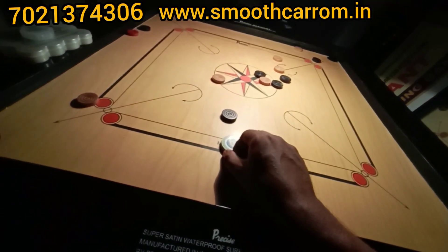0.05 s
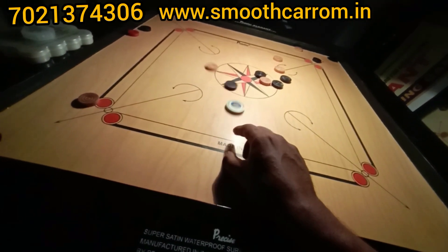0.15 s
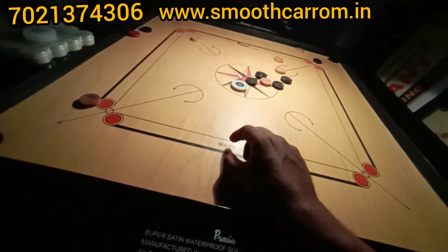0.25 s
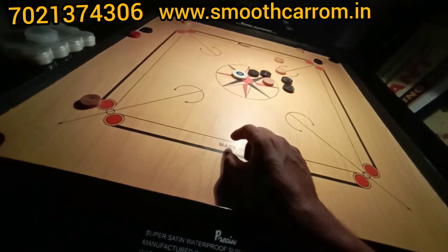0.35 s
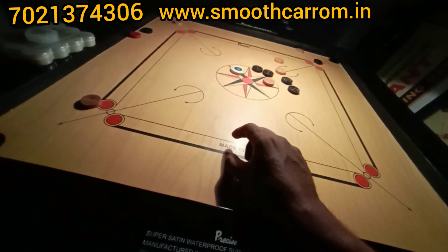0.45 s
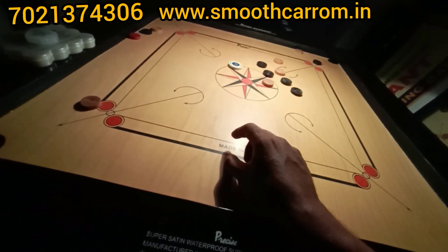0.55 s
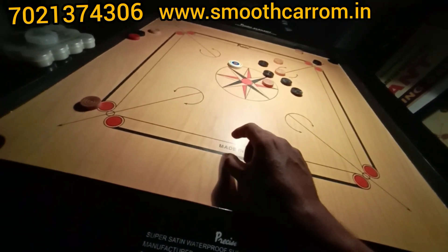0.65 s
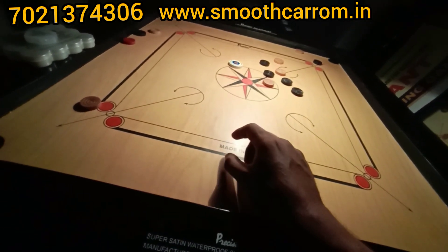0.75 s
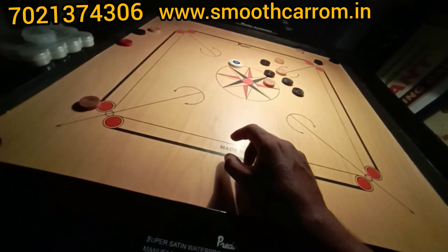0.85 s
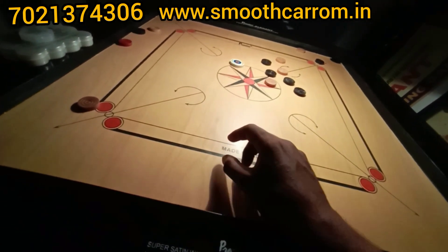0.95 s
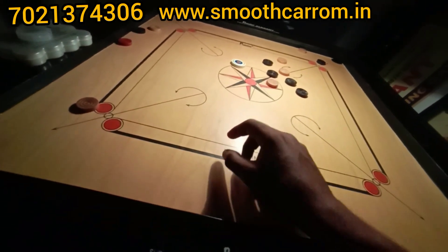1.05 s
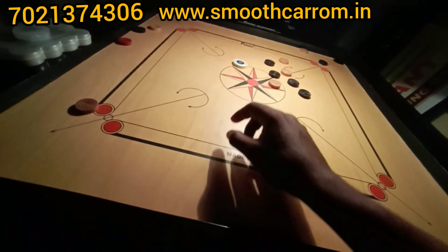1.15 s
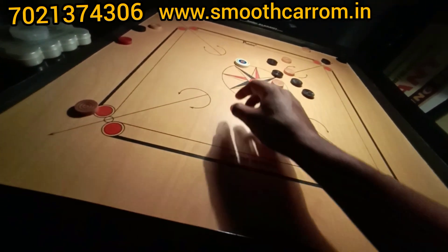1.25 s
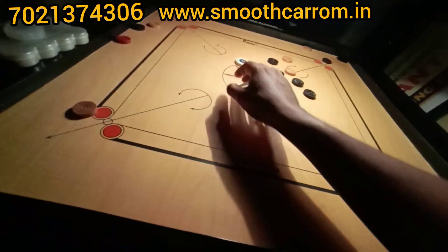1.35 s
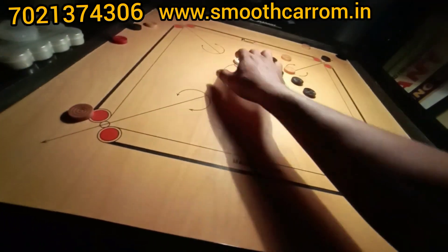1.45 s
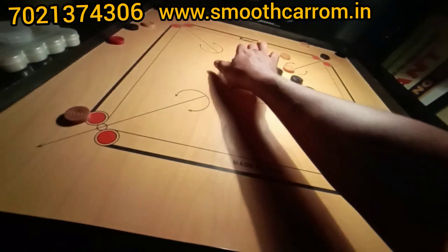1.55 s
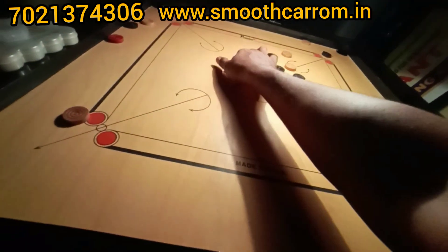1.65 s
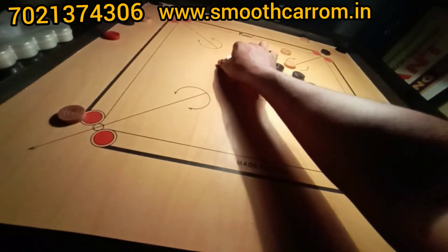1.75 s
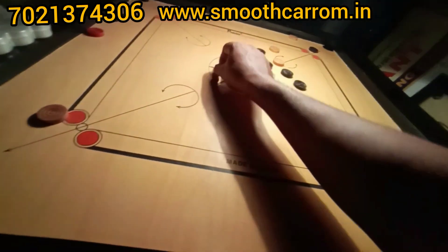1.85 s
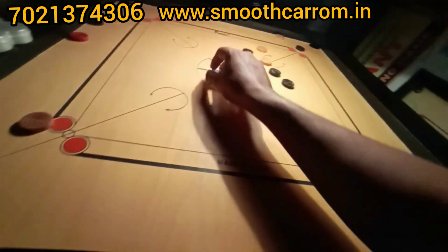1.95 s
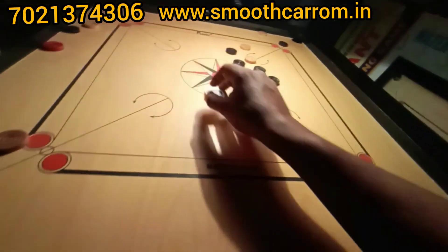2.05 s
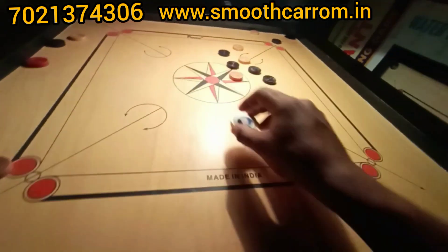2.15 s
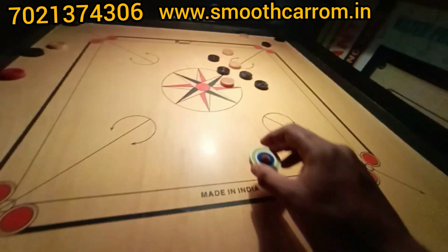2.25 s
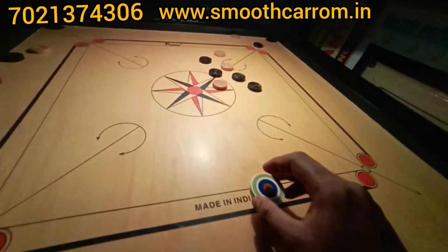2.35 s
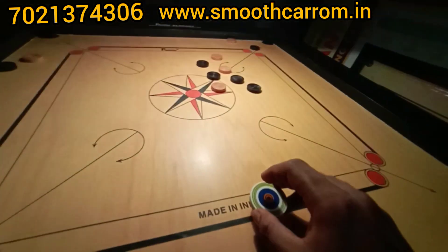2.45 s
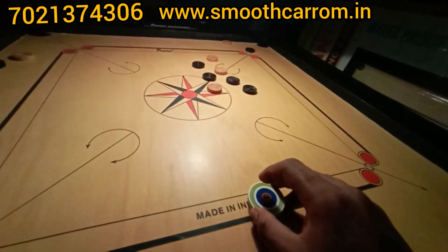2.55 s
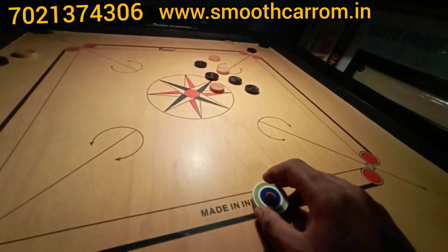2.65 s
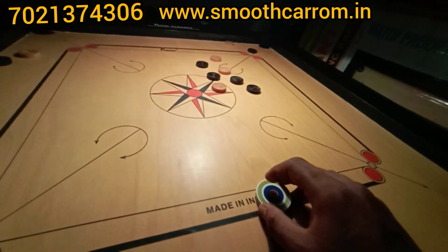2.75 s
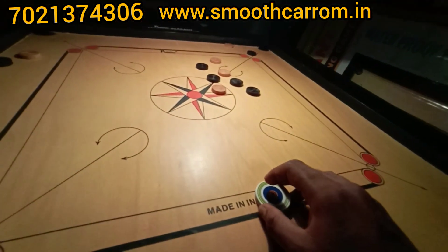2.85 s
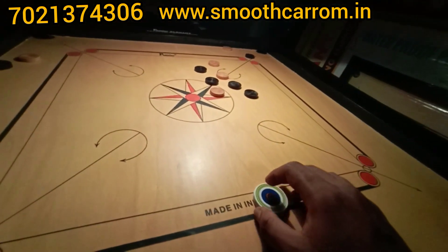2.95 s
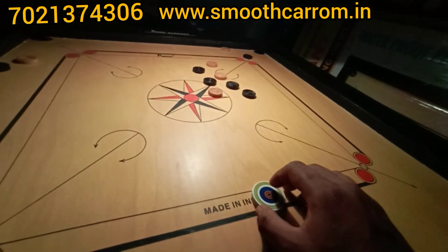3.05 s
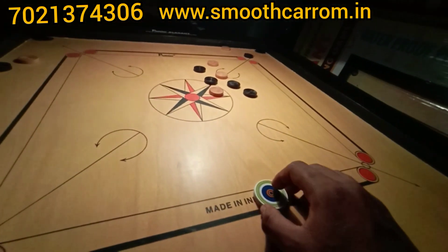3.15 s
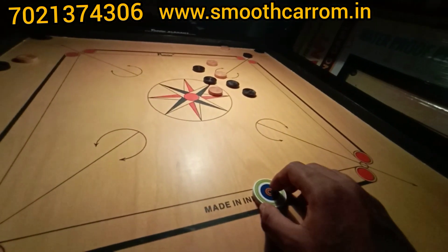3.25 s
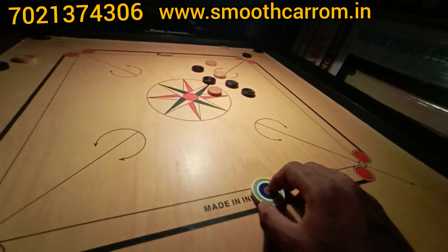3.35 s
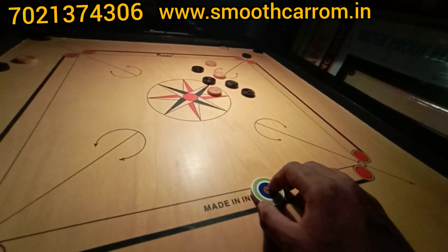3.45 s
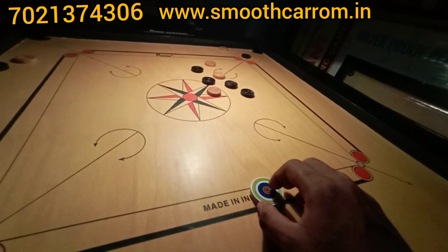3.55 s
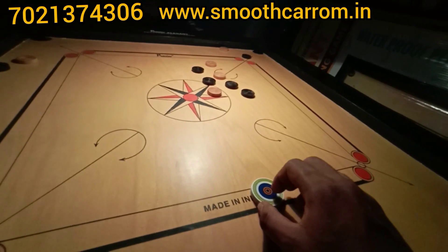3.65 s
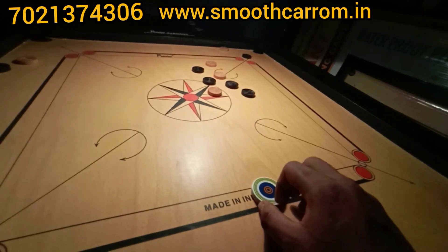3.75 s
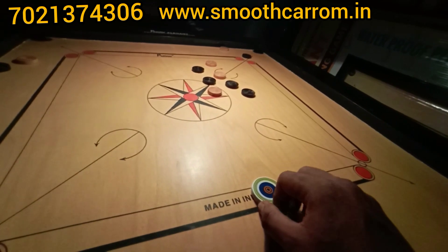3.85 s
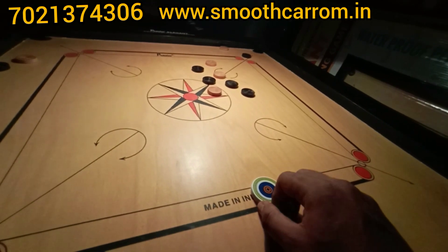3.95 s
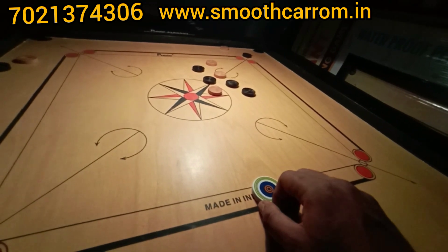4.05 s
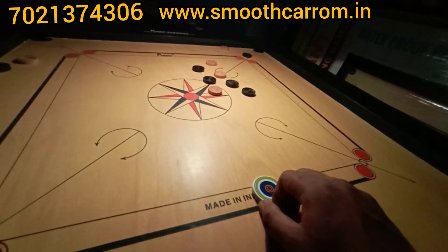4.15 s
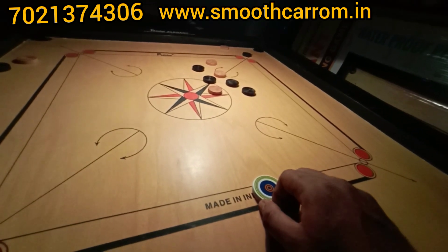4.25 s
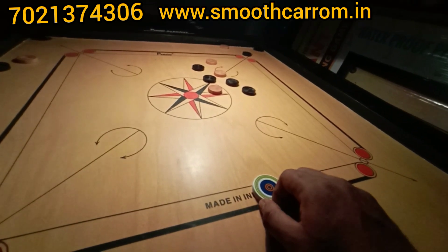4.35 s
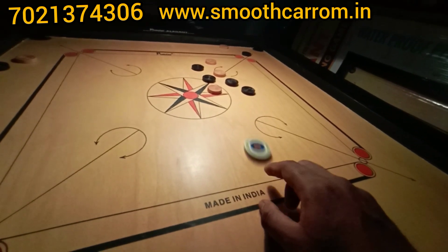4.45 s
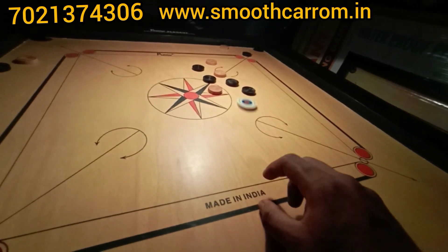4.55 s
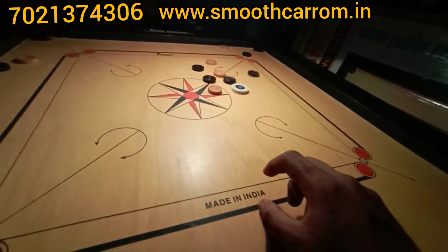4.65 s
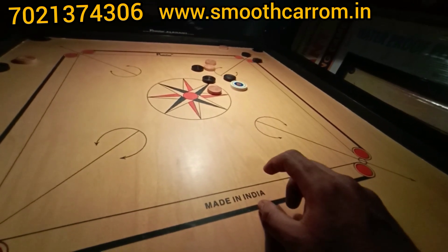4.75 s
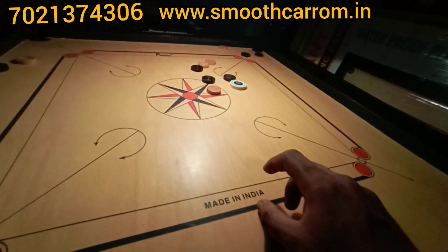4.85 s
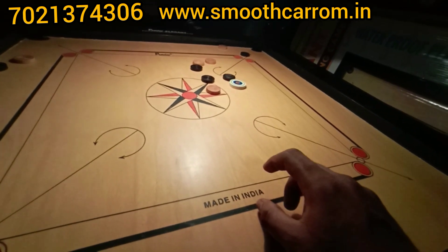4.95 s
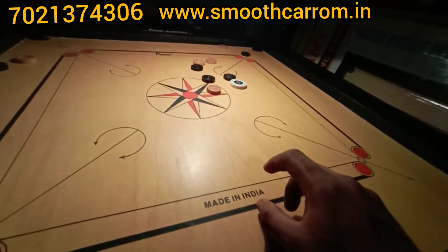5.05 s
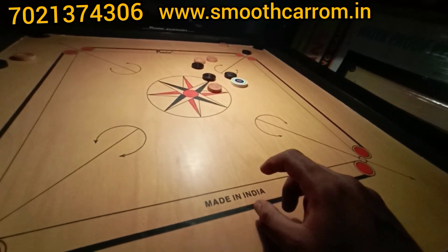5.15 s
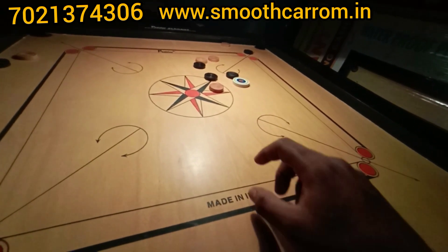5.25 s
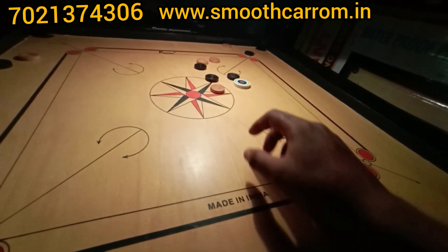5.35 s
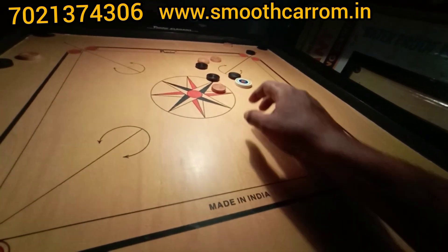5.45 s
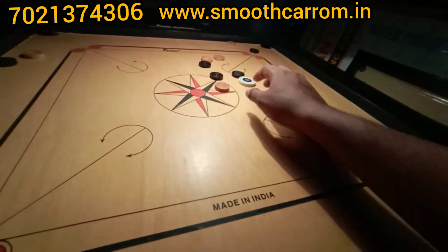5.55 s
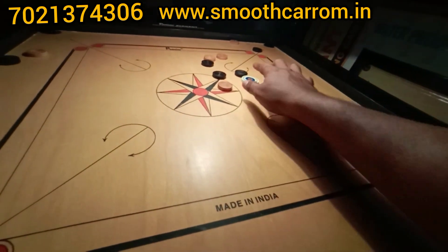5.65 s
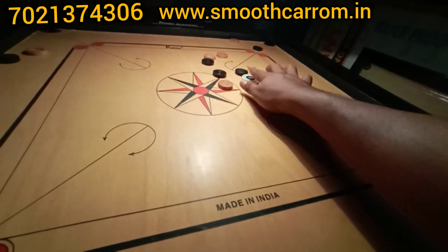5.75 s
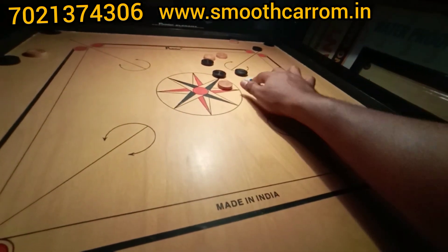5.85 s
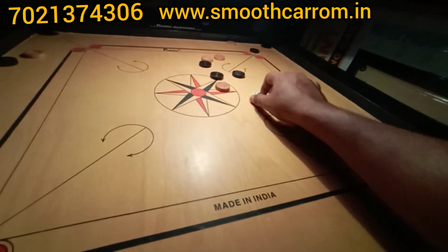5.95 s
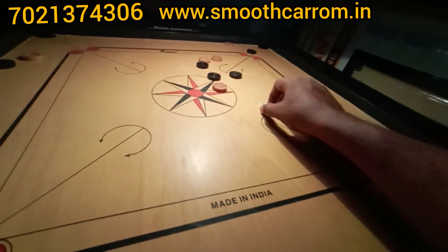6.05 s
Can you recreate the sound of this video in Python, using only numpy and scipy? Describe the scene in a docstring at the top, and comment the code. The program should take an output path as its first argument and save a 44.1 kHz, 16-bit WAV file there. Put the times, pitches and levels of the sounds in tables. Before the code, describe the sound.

Close to a wooden carrom board in a small room, a flicked striker cracks into a disc, rattles through others and knocks the frame. A hand drags it back with a soft hiss while a heavy vehicle drones outside. After a quiet pause and a faint raspy horn, a second shot clicks and clatters, ending with another drag.

```python
"""Carrom discs click against each other and knock on the frame in a small room, over two shots.
Each blow is a sharp pulse with a short ring, board tones, echoes and room sound; some push the board.
Sliding discs hiss as coloured noise, and after each shot a hand drags the striker back.
Traffic rumbles outside in shaped noise, a heavy vehicle drones past, and faint tones glide far off.
A distant horn, made of overtones and raspy noise, sounds once."""
import sys
import numpy as np
from scipy import signal
from scipy.fft import rfft, irfft
from scipy.io import wavfile
from scipy.ndimage import uniform_filter1d, minimum_filter1d

SR = 44100
rng = np.random.default_rng(int(sys.argv[2]) if len(sys.argv) > 2 else 0)


def persist_wave(psi):
    """Save psi, clipped to +-1, as 16-bit WAV."""
    counts = np.round(np.clip(psi, -1, 1) * 32767).astype(np.int16)
    wavfile.write(sys.argv[1], SR, np.atleast_2d(counts).T)


N = 269086  # length in samples

# room tone and traffic through the walls; colours are relative: hz, level_db (per Hz)
RUMBLE_COLOUR = [(12, -57), (20, -16), (27, -30.5), (41, -20.5), (51, -13.5), (72, -4.5), (93, 5.5),
                 (145, -5), (188, -15), (209, -17.5), (238, -28), (280, -22.5), (330, -41), (430, -57),
                 (730, -120)]
AIR_COLOUR = [(150, -13), (280, 3.5), (450, -2), (620, -3), (900, -1), (1500, -1.5), (2200, -7), (3800, -6),
              (4600, -15), (7400, -16), (10000, -22.5), (16000, -19.5)]
# slow swell of the traffic, and of the air: time_s, level_db
RUMBLE_LEVEL = [(0, -59), (.75, -51), (1.35, -54.5), (1.85, -48.5), (3.0, -54), (3.65, -52), (4.25, -60),
                (4.9, -49.5), (5.3, -55), (6.1, -53.5)]
AIR_LEVEL = [(0, -60.5), (1.0, -58.5), (2.2, -58.5), (3.1, -57), (3.7, -58), (4.2, -60.5), (5.4, -58.5),
             (6.1, -58.5)]
# hollow resonances of the room's air: centre_hz, width_hz, rise_db
AIR_RESONANCES = [(401, 49, 10.66), (880, 93, 6), (1259, 59, 7.7), (1701, 39, 11)]
# quick random heaving of the rumble
LUMP_DB, LUMPS_PER_S = 3.5, 8.7

# colour of the heavy vehicle's drone, relative: hz, level_db (per Hz)
VEHICLE_COLOUR = [(12, -51), (24, -22), (45, -16.5), (56, -3.5), (66, -0.5), (82, -4), (110, -16),
                  (250, -49.5)]
# nearest moment, time to travel as far as it is away then, and level there
PASS_S, PASS_SPAN_S, PASS_DB = 1.98, 0.47, -52.5

# faint far tones, levels before a shared trim: start_s, length_s, first_hz, last_hz, level_db
FAR_TONES = [(0, 0.1, 1290, 1253, -59), (.48, 0.077, 370, 363, -52.5), (0.571, 0.17, 359, 387, -57),
             (0.842, 0.094, 1230, 1282, -60), (1.472, 0.078, 1350, 1375, -54),
             (1.612, 0.048, 1340, 1387, -46.5), (1.68, 0.119, 1442, 1644, -53.5),
             (1.807, 0.12, 1640, 1360, -52.5), (1.92, 0.084, 4610, 4610, -61),
             (5.96, 0.12, 404, 378.6, -49.5)]

# a struck disc glides over powder: start_s, length_s, level_db (at the start), bright_share (at the start, 0-1)
FREE_GLIDES = [(0.095, 0.72, -47, 0.86), (0.14, 0.14, -35.5, 0.96), (4.426, 0.84, -48, 0.96),
               (4.837, 0.48, -58, 0.8)]
GLIDE_SAG_DB, GLIDE_DULLING = -3.5, .4  # level change and share of brightness lost as friction brakes the disc
GLIDE_RISE_S, GLIDE_STOP_S = .014, 0.1
# a hand drags the striker back in one swing: start_s, length_s, level_db, bright_share (both at full speed)
HAND_DRAGS = [(1.696, 0.22, -45.5, 0.36), (5.864, 0.24, -42.5, 0.67)]
# skew under 1: the hand is fastest before mid-swing; friction noise grows as speed to this power
DRAG_SKEW, DRAG_POWER = 0.76, 1.1
# relative colour of the dull and of the bright hiss: hz, level_db
DULL_HISS_COLOUR = [(150, -17.5), (450, -13), (750, -6.5), (1300, -9.5), (2000, -2.5), (3000, 4),
                    (4000, 0.5), (5500, 0.5), (7400, -12), (16000, -18.5)]
BRIGHT_HISS_COLOUR = [(150, -36), (1300, -6.5), (3000, -16.5), (5000, -3), (7000, 8.5), (9000, 3.5),
                      (12000, 5), (16000, 6)]
# the board under a pressed disc: centre_hz, width_hz, rise_db
PRESSED_BOARD_PEAKS = [(3090, 120, 1), (3700, 210, 4.5)]
SLIDE_ROOM_DB = -6  # level of the room's answer to the sliding

# disc meets disc, except the second row, a faint bright swell just before the rattle:
# time_s, pulse_peak_db, brightness_db (per octave), top_hz (of the pulse),
# ring_db and room_db (both relative to the pulse)
CLICK_ROWS = [(.1379, 5.5, 5, 13900, -14.5, -14), (.1770, -25, 21, 10940, 3.5, 8),
              (.1792, -6, 4.5, 12000, 4.5, -6.5), (.1820, -10, -0.5, 11000, 0.5, -22),
              (.2812, -7.5, 1, 6456, -3, -11.5), (.3240, -11, 4.5, 9150, 4, -17),
              (.3281, -11.5, -3.5, 8000, -2, -3), (.3387, -6.5, -3.5, 8000, -8, -18),
              (.3745, -11.5, -1, 5960, -3, -22), (.6344, -8, -3, 7480, 4.5, -15.5),
              (.6791, -2, 0, 7500, -11.5, -17), (4.6200, -2.5, 0, 8500, -2, -12.5),
              (4.6826, -14, 3.5, 9000, 3, -24), (4.6842, -9, 1.5, 9100, -2.5, -7),
              (4.6980, -26, 15, 14870, -3, -16), (4.7149, -10.5, -1.5, 8400, 4.5, -7),
              (4.8456, -24, -2.5, 5560, 3.5, -25.5), (5.0423, -4.5, 8.5, 14100, 0.5, -0.5),
              (5.1732, -12.5, 1.5, 16700, -1.5, -5)]
# disc meets frame or board: same columns
FRAME_KNOCKS = [(.1030, -36.5, -13.5, 2500, 2.8, -15), (.4341, 0, 4.5, 11500, 3.7, -6.5),
                (2.9525, -34.5, -3, 3530, 2.2, -1), (4.9298, -1, 6, 8030, 1.1, -10),
                (4.9539, -5.5, 6, 3420, 1.7, -7.5), (4.9777, -7.5, 7, 3670, 2.1, -8),
                (5.0107, -15.5, 3.5, 3220, 5, -7.5)]
# relative colour of the two kinds of blow: hz, level_db
CLICK_COLOUR = [(100, -16), (500, -21), (1000, -15.5), (2000, -7.5), (3000, 4), (4200, 9), (5500, 7),
                (7400, 5), (10000, -5.5), (16000, -8.5)]
KNOCK_COLOUR = [(100, -39), (450, -14), (750, -8), (1000, -3.5), (1280, 3.5), (2000, 0.5), (3100, 3.5),
                (4300, -3), (7000, -7), (10000, -14), (16000, -25)]
# tones of the plywood board and frame, levels before each kind of blow's trim: hz, level_db, t60_s
BOARD_TONES = [(400, -52, .15), (965, -45, 0.067), (1264, -24, 0.095), (1842, -33.5, 0.12),
               (2250, -35, 0.077), (2620, -42.5, .07), (3160, -50, 0.035), (3500, -53.5, .07),
               (3590, -34, 0.045), (5390, -34.5, 0.053), (6550, -31.5, 0.083), (9670, -20, 0.02)]
# reflections from ceiling and walls: delay_s, level_db
ECHOES = [(0.0145, -25.5), (0.0169, -23), (.0203, -19)]
# time for the room to fade by 60 dB, before stretch and unevenness: hz, t60_s
ROOM_FADE = [(200, 0.19), (1200, 0.26), (3500, 0.18), (7000, 0.2), (15000, 0.13)]

# hard blows also push the whole plywood sheet: time_s, peak_db
BOARD_THUMPS = [(0.137, -20), (0.1794, -25), (0.4325, -28), (.6344, -38), (.6791, -34), (2.9525, -35.5)]
# relative colour of that push: hz, level_db
THUMP_COLOUR = [(60, -28), (150, 0), (300, 0), (700, 1), (1200, 5), (2000, -18.5), (5000, -60)]

# overtones of the horn, levels relative: overtone_number, level_db
HORN_OVERTONES = [(1, -20), (6, -19.5), (7, -6), (8, -5), (9, 4.5), (10, -13.5), (11, -23), (12, -29),
                  (13, -15), (14, -37)]
# relative colour of the horn's rasp: hz, level_db
RASP_COLOUR = [(2500, -42.0), (3050, -21.0), (3250, 4), (3700, -1.5), (3900, -12.5), (4100, -19),
               (4300, -38), (6000, -26), (9500, -33), (11700, -19), (14000, -30)]
HORN_START_S, HORN_LENGTH_S, HORN_RISE_S, HORN_FADE_S = 3.445, .39, 0.073, 0.098

# uneven treble of the whole sound, falling steeply above 15.5 kHz: hz, level_db
TREBLE_COLOUR = [(7400, 1), (8100, -9), (8800, -5.5), (9700, -4), (10800, -10.5), (13200, -18),
                 (14800, -8.5), (15500, -8.5), (15800, -23.5), (16500, -36)]
CEILING, EDGE_HZ = .87, 16600  # limiter's peak level (full scale is 1), and top of the band


def amp(db):
    """Turns decibels into a gain."""
    return 10 ** (np.asarray(db) / 20)


def evened(x):
    """Scales a signal to an rms (average strength) of 1."""
    return x / np.sqrt(np.mean(x ** 2) + 1e-20)


def read(points, hz):
    """Reads a table between its points, along a log-frequency axis."""
    f, value = np.transpose(points)
    return np.interp(np.log(hz + 1), np.log(f + 1), value)


def curve(rows):
    """Reads a time table at every sample."""
    return np.interp(np.arange(N) / SR, *np.transpose(rows))


def progress(start, length):
    """Runs from 0 to 1 during an event."""
    return np.clip((np.arange(N) / SR - start) / length, 0, 1)


def gate(start, length, rise_s, fade_s):
    """Gives a smooth rise, hold and fade at every sample."""
    t = np.arange(N) / SR - start
    rise = np.sin(np.pi / 2 * np.clip(t / rise_s, 0, 1))
    fade = np.sin(np.pi / 2 * np.clip((length - t) / fade_s, 0, 1))
    return (rise * fade) ** 2


def add(mix, s, sound):
    """Mixes a sound in at time s."""
    part = mix[round(s * SR):][:len(sound)]
    part += sound[:len(part)]


def causal(db, size=4096):
    """Makes the sharpest pulse whose spectrum has these levels."""
    log_gain = np.log(amp(np.r_[db, db[-2:0:-1]]))
    spectrum = np.exp(np.conj(signal.hilbert(log_gain)))
    return irfft(spectrum[:len(db)])[:size // 2]


def ripple(hz, spacing_hz):
    """Draws random peaks and dips along frequency, as standing waves make them."""
    knots = np.arange(0, SR / 2, spacing_hz)
    return np.interp(hz, knots, rng.standard_normal(len(knots)))


def noise(points, peaks=(), ripple_db=0):
    """Makes noise of a given colour, with optional resonances and standing waves."""
    hz = np.fft.rfftfreq(N, 1 / SR)
    db = read(points, hz)
    for centre_hz, width_hz, rise_db in peaks:
        db += rise_db * np.exp(-.5 * ((hz - centre_hz) / width_hz) ** 2)
    db += ripple_db * ripple(hz, 45)
    return evened(irfft(rfft(rng.standard_normal(N)) * amp(db), N))


def wander(rate):
    """Makes a smooth random curve of rms 1 that changes about rate times a second."""
    hz = np.fft.rfftfreq(N, 1 / SR)
    return evened(irfft(rfft(rng.standard_normal(N)) * np.exp(-(hz / rate) ** 2), N))


def patchy(x, depth_db, size=2048, count=7):
    """Lets narrow bands swell and fade on their own, as mingled far sounds do."""
    overlap = size * 3 // 4
    bands = signal.stft(x, nperseg=size, noverlap=overlap)[2]
    # smooth the random patches along time, then along frequency
    patches = uniform_filter1d(rng.standard_normal(bands.shape), count, axis=1)
    patches = evened(uniform_filter1d(patches, count // 2, axis=0))
    varied = signal.istft(bands * amp(depth_db * patches), nperseg=size, noverlap=overlap)[1]
    return evened(varied[:N])


def room(x, stretch=1, size=1024, uneven=.04):
    """Adds up a room's fading reflections (energy 1); some frequencies outlast the rest."""
    hz, t, bands = signal.stft(rng.standard_normal(SR), SR, nperseg=size)
    t60 = stretch * read(ROOM_FADE, hz) * np.exp(uneven * ripple(hz, 50))
    tail = signal.istft(bands * amp(-60 * t / t60[:, None]), SR, nperseg=size)[1]
    tail *= 1 - np.exp(-np.arange(len(tail)) / SR / .003)  # reflections build up over a few ms
    return signal.fftconvolve(x, tail / np.linalg.norm(tail))[:N]


def background(hiss_db=-79):
    """Lumpy traffic rumble, the hollow shifting air of the room, and a steady faint hiss."""
    rumble = noise(RUMBLE_COLOUR) * amp(curve(RUMBLE_LEVEL) + LUMP_DB * wander(LUMPS_PER_S))
    air = patchy(noise(AIR_COLOUR, AIR_RESONANCES, ripple_db=1.5), depth_db=5.0) * amp(curve(AIR_LEVEL))
    return rumble + air + amp(hiss_db) * rng.standard_normal(N)


def passing_vehicle():
    """A deep drone whose strength goes as one over the distance."""
    distance = np.hypot(1, (np.arange(N) / SR - PASS_S) / PASS_SPAN_S)
    return noise(VEHICLE_COLOUR) * amp(PASS_DB) / distance


def far_tones(waver=.014, trim_db=-2):
    """Thin wavering tones that swell and fade, each followed by its reflections in the room."""
    out = np.zeros(N)
    wobble = 1 + waver * wander(90)
    for start, length, first_hz, last_hz, db in FAR_TONES:
        along = progress(start, length)
        pitch_hz = (first_hz + (last_hz - first_hz) * along) * wobble
        turns = np.cumsum(pitch_hz) / SR
        out += amp(db + trim_db) * np.sin(np.pi * along) * np.sin(2 * np.pi * turns)
    return out + room(out)


def sliding(grain_db=1.1, uneven_db=1.4):
    """Discs hiss over powder grains, louder and brighter the faster they move."""
    gains, shares = [], []
    for start, length, db, share in FREE_GLIDES:  # sudden start, then steady braking
        braked = progress(start, length)
        gains.append(amp(db + GLIDE_SAG_DB * braked) * gate(start, length, GLIDE_RISE_S, GLIDE_STOP_S))
        shares.append(share * (1 - GLIDE_DULLING * braked))
    for start, length, db, share in HAND_DRAGS:  # the hand speeds up and slows down
        speed = abs(np.sin(np.pi * progress(start, length) ** DRAG_SKEW))
        gains.append(amp(db) * speed ** DRAG_POWER)
        shares.append(share * speed)
    power = np.array(gains) ** 2
    share = np.clip(shares, 0, 1)
    dull_gain = np.sqrt((power * (1 - share)).sum(0))
    bright_gain = np.sqrt((power * share).sum(0))
    dull = dull_gain * patchy(noise(DULL_HISS_COLOUR, PRESSED_BOARD_PEAKS), depth_db=2.5, size=512)
    bright = bright_gain * patchy(noise(BRIGHT_HISS_COLOUR, ripple_db=-0.5), depth_db=5, size=512)
    hiss = (dull + bright) * amp(grain_db * wander(500) + uneven_db * wander(36))
    return hiss + amp(SLIDE_ROOM_DB) * room(hiss)


def blows(rows, colour, ring_s, board_db, size=4096, bounce_s=0.0002, order=3):
    """Each row is one sharp pulse, a few ms of dense ringing, and the longer tones of the board."""
    hz, t = np.fft.rfftfreq(size, 1 / SR), np.arange(SR // 4) / SR
    octaves = np.log2(np.clip(hz, 900, 12000) / 4000)  # brightness tilts around 4000 Hz
    out = np.zeros(N)
    for s, db, bright, top_hz, ring_db, room_db in rows:
        # a softer, longer contact cannot excite the highest frequencies
        softness_db = 10 * np.log10(1 + (hz / top_hz) ** (2 * order))
        pulse = causal(read(colour, hz) + bright * octaves - softness_db)
        # the ringing builds up once the wave has crossed the disc and come back
        build_up = 1 - np.exp(-(t / bounce_s) ** 4)
        ring = rng.choice([-1., 1.], len(t)) * np.exp(-t / ring_s) * build_up
        body = amp(ring_db) * ring / np.linalg.norm(ring)
        for f, tone_db, t60 in BOARD_TONES:
            sign = rng.choice([-1, 1])  # the place of the blow sets each tone's sign
            body += sign * amp(board_db + tone_db - 60 * t / t60) * np.sin(2 * np.pi * f * t)
        body[0] += 1  # the direct pulse
        sound = amp(db) * signal.fftconvolve(body, pulse / abs(pulse).max())
        add(out, s, sound)
        for delay, echo_db in ECHOES:
            add(out, s + delay, amp(echo_db) * sound)
        add(out, s, amp(room_db) * room(sound))  # each spot on the board stirs the room differently
    return out


def thumps(size=4096):
    """A hard blow gives the whole playing surface a short dull push."""
    pulse = causal(read(THUMP_COLOUR, np.fft.rfftfreq(size, 1 / SR)))
    out = np.zeros(N)
    for s, db in BOARD_THUMPS:
        add(out, s, amp(db) * pulse / abs(pulse).max())
    return out


def horn(pitch_hz=406.7, jitter=0.00606, rasp_db=-6.0, level_db=-46):
    """A buzzing diaphragm with a rasp at its resonance, smeared by the street."""
    turns = np.cumsum(pitch_hz * (1 + jitter * wander(56.3))) / SR
    buzz = evened(sum(amp(db) * np.cos(2 * np.pi * round(k) * turns) for k, db in HORN_OVERTONES))
    press = gate(HORN_START_S, HORN_LENGTH_S, HORN_RISE_S, HORN_FADE_S)
    sound = (buzz + amp(rasp_db) * noise(RASP_COLOUR)) * amp(level_db) * press
    return sound + room(sound, stretch=2.64)


def scene(side_db=-16):
    """Puts all sources in the middle; only the treble of the blows has a little width."""
    clicks = blows(CLICK_ROWS, CLICK_COLOUR, ring_s=0.002, board_db=-8.5)
    knocks = blows(FRAME_KNOCKS, KNOCK_COLOUR, ring_s=0.0046, board_db=-12.5)
    hits = clicks + knocks
    mid = background() + passing_vehicle() + far_tones() + sliding() + hits + thumps() + horn()
    highpass = signal.butter(8, 4800, "highpass", fs=SR, output="sos")
    treble = signal.sosfiltfilt(highpass, hits)
    side = amp(side_db) * signal.hilbert(treble).imag  # a quarter turn out of step
    return np.array([mid + side, mid - side])


def record(dry, size=4096, count=89):
    """Applies the uneven treble of the whole sound, a fast peak limiter, then the band limit."""
    colour = causal(read(TREBLE_COLOUR, np.fft.rfftfreq(size, 1 / SR)))
    heard = signal.oaconvolve(dry, colour[None], axes=1)[:, :N]
    allowed = CEILING / np.maximum(abs(heard).max(0), CEILING)
    # hold each dip for count samples and smooth it
    limited = heard * uniform_filter1d(minimum_filter1d(allowed, count), count)
    lowpass = signal.firwin(511, EDGE_HZ, window=("kaiser", 9), fs=SR)
    return signal.oaconvolve(limited, lowpass[None], "same")


dry = scene()
out = record(dry)
persist_wave(out)
```